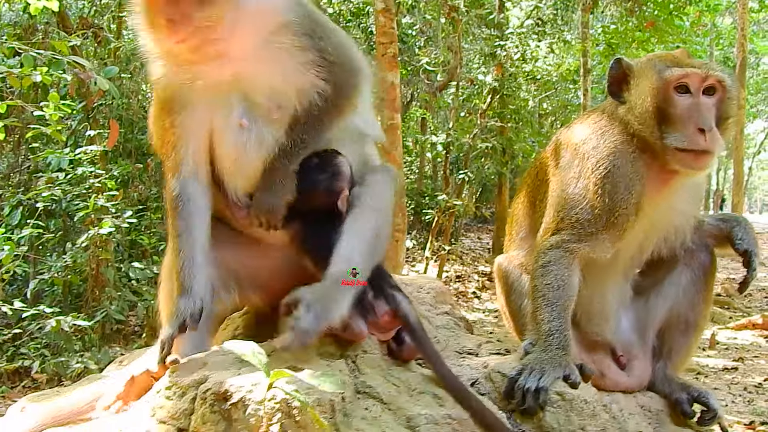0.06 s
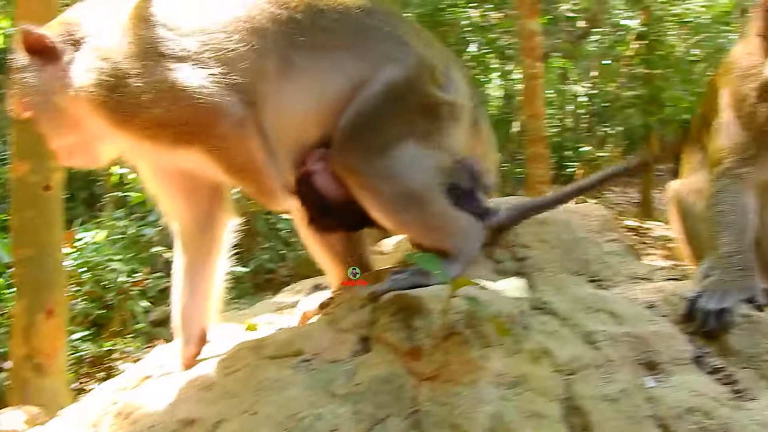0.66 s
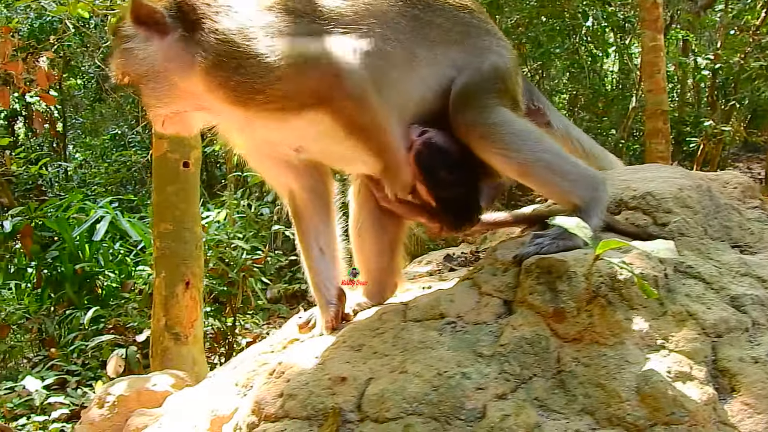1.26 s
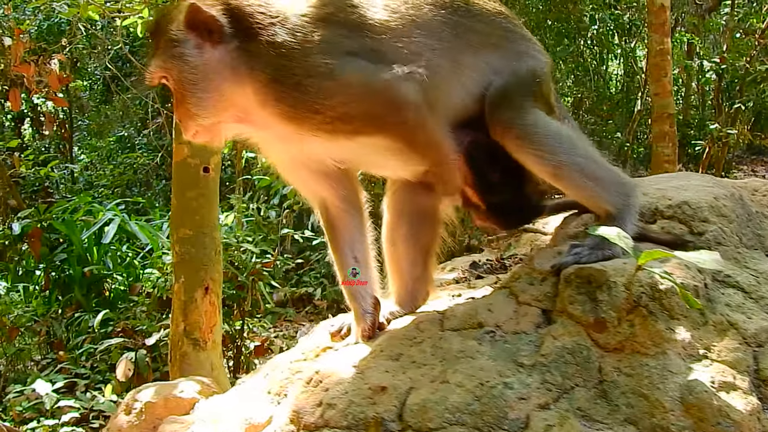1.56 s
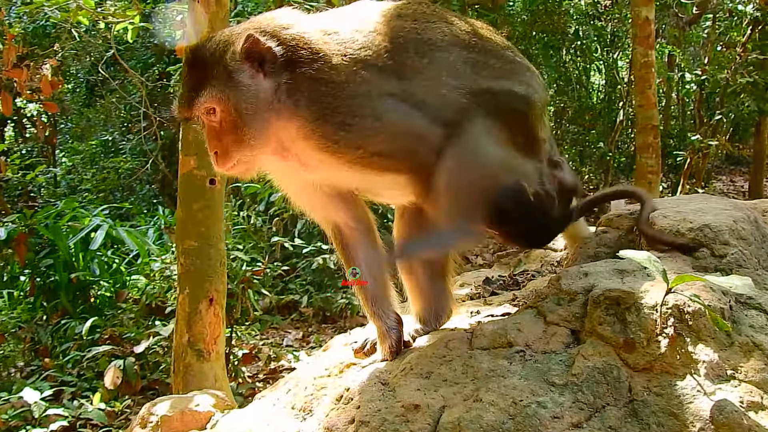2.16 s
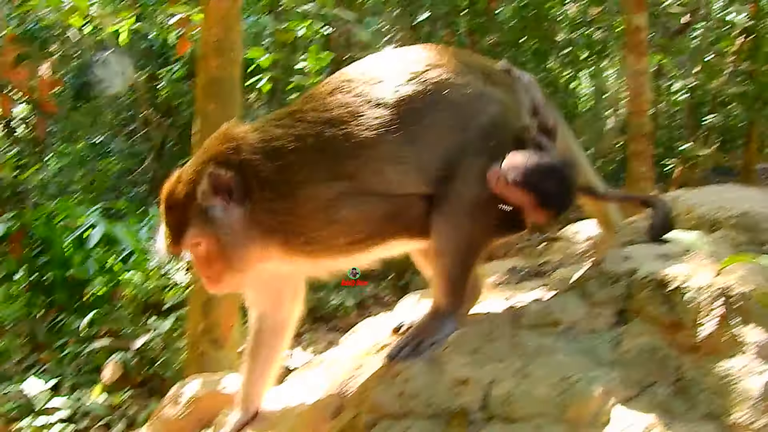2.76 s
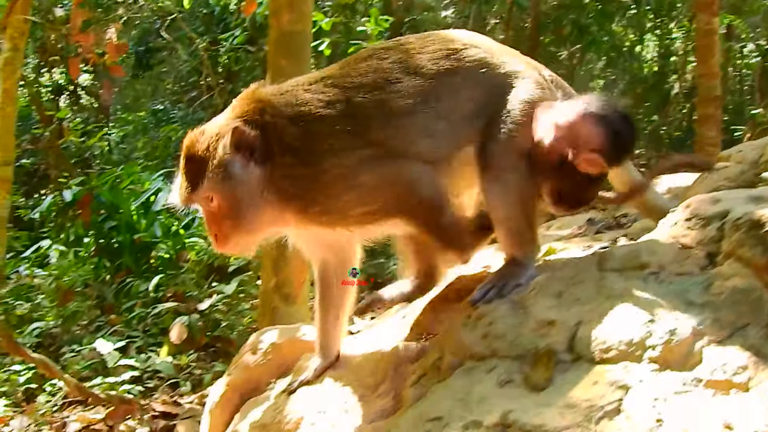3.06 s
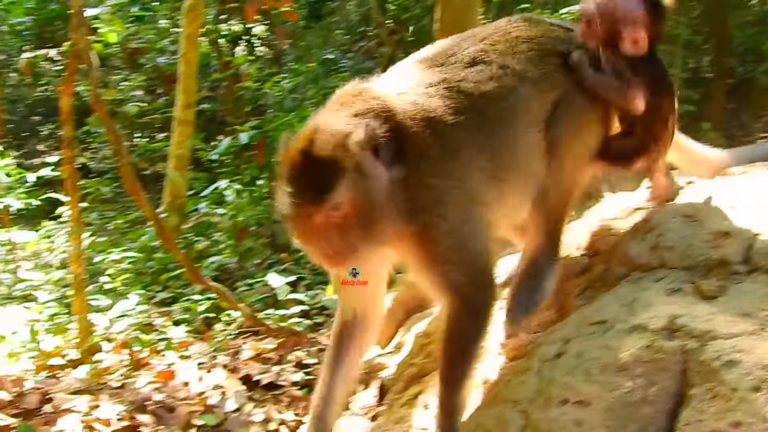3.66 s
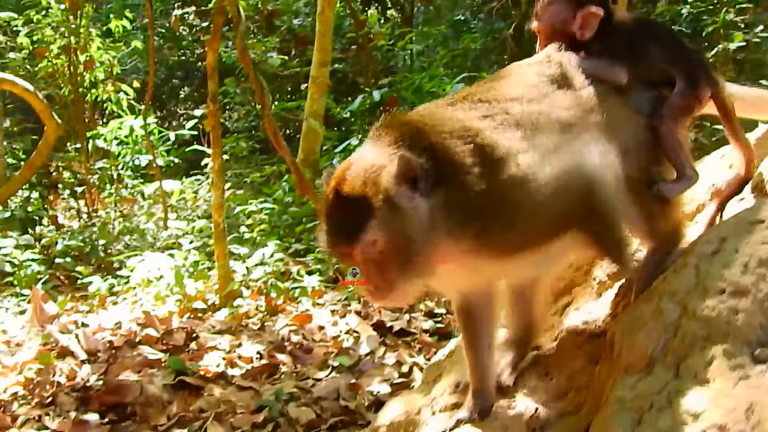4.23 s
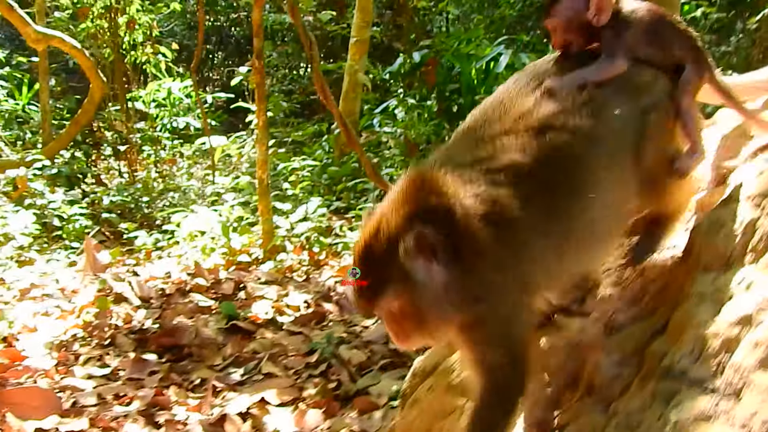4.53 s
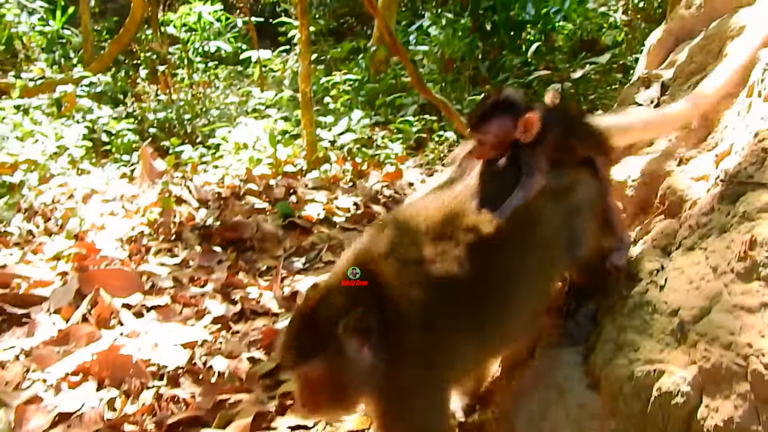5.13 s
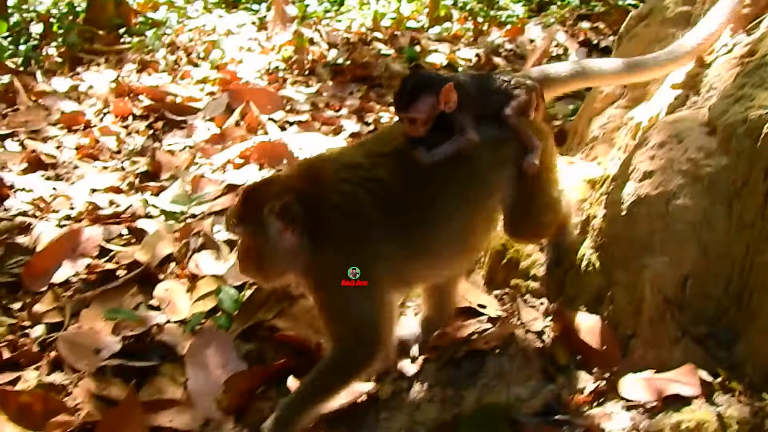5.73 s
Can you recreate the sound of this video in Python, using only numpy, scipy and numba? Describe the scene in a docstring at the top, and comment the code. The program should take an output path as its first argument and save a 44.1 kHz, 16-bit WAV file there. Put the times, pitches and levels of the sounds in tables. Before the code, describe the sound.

In a quiet forest, a few twigs snap and a monkey's feet scuff over rock and leaves. Close by, a baby monkey chirps, then lets out a quick run of shrill, falling squeals, a thin hoarse whine and a last squeak, each with a slight echo. Dry leaves rustle more toward the end, while faint birds whistle and a slow, distant engine thuds gradually louder.

```python
"""A forest: close by, a baby monkey squeaks and squeals as it climbs onto its walking mother.
Its tight vocal folds give whistles that fall in jumps, with a lower second voice and a rasp,
then a thin whine; the trees echo each call. Dry leaves rustle and twigs snap underfoot.
Far off, birds whistle faintly and a slow engine thuds through its exhaust, growing louder.
A limiter ducks it all under the loudest squeals."""
import sys
import numpy as np
from scipy import signal
from scipy.fft import rfft, irfft
from scipy.io import wavfile
from scipy.ndimage import uniform_filter1d
from numba import njit

SR = 44100
rng = np.random.default_rng(int(sys.argv[2]) if len(sys.argv) > 2 else 0)


def transcribe(signal):
    """Save signal, clipped to [-1, 1], as a 16-bit WAV file at the path in sys.argv[1]."""
    frames = np.atleast_2d(signal).T
    limited = np.clip(frames, -1, 1)
    pcm = np.round(limited * 32767).astype(np.int16)
    wavfile.write(sys.argv[1], SR, pcm)


N = 255471
TIME = np.arange(N) / SR


def undb(db):
    """Decibels to gain."""
    return 10 ** (np.asarray(db) / 20)


def unit(x):
    """Scale to rms 1."""
    return x / np.sqrt(np.mean(x ** 2))


def noise():
    """White noise."""
    return rng.standard_normal(N)


def decay(t60_s):
    """One second of decaying noise."""
    return rng.standard_normal(SR) * undb(-60 * TIME[:SR] / t60_s)


def walk(rate_hz):
    """Smooth random curve, rms 1, low-passed at rate_hz."""
    steps = rng.standard_normal(N // 8 + 2)
    smooth = unit(signal.sosfilt(signal.butter(3, rate_hz, fs=SR / 8, output="sos"), steps))
    return np.interp(np.arange(N) / 8, np.arange(len(smooth)), smooth)


def phase_of(hz):
    """Running phase of a frequency curve, in radians."""
    return 2 * np.pi * np.cumsum(hz) / SR


def curves(rows):
    """Per-sample curve for each column after time_s."""
    time_s, *columns = np.transpose(rows)
    return [np.interp(TIME, time_s, column) for column in columns]


def swell(start_s, length_s, rise_s, fall_s):
    """Trapezoid envelope."""
    return np.clip(np.minimum((TIME - start_s) / rise_s, (start_s + length_s - TIME) / fall_s), 0, 1)


def add(track, start_s, sound):
    """Mix a short sound into a track."""
    start = int(start_s * SR)
    track[start:start + len(sound)] += sound[:N - start]


def colour(x, response, size=8192):
    """Minimum-phase filter from rows of freq_hz, gain_db."""
    hz, db = np.transpose(response)
    gain = undb(np.interp(np.log(np.fft.rfftfreq(size, 1 / SR) + 1), np.log(hz), db))
    cepstrum = irfft(np.log(gain))
    cepstrum[1:size // 2] *= 2
    cepstrum[size // 2 + 1:] = 0
    impulse = irfft(np.exp(rfft(cepstrum)))[:size // 2]
    return signal.oaconvolve(x, impulse)[:N]


def stereo(mid, side, side_db):
    """Mid and side to left and right."""
    return mid + undb(side_db) * side * np.array([[1], [-1]])


def glides(rows, overtone_db, jitter=0.018):
    """Notes that swell, slide and fade, each with an octave overtone."""
    waver = 1 + jitter * (walk(680) + walk(30) / 2)
    out = np.zeros(N)
    for start_s, length_s, start_hz, end_hz, level_db in rows:
        progress = np.linspace(0, 1, int(length_s * SR))
        pitch_hz = start_hz + (end_hz - start_hz) * progress
        phase = phase_of(pitch_hz * waver[int(start_s * SR):][:len(progress)])
        tone = np.sin(phase) + undb(overtone_db) * np.sin(2 * phase)
        add(out, start_s, undb(level_db) * np.sqrt(8 * progress * (1 - progress)) * tone)
    return out


# bird whistles: start_s, length_s, start_hz, end_hz, level_db
BIRD_NOTES = [(.01, .38, 2610, 2530, -77), (.14, .22, 4290, 4170, -76.5), (4.782, .023, 1880, 2180, -60),
              (4.80, .033, 1430, 1270, -61), (4.80, .046, 6570, 5850, -59)]


def birds():
    """Faint, distant whistles that flutter in level."""
    return glides(BIRD_NOTES, overtone_db=-32) * undb(2 * walk(25))


# engine run: time_s, firing_hz, drone_db, thud_db
ENGINE_RUN = [(0.0, 30.42, -60.5, -60.5), (2.53, 31.34, -58.5, -63.5), (3.5, 31.56, -57, -59.5),
              (4.2, 31.76, -57.5, -55), (5.15, 31.87, -56, -50), (5.79, 31.26, -50, -47)]
# exhaust resonances in the drone: freq_hz, gain_db
EXHAUST_EQ = [(30, -46.5), (95, -16), (125, 5.5), (158, 6), (190, 2), (235, -4), (290, -2.5), (370, -4),
              (480, -12), (900, -28.5), (9000, -75)]
# boom of a direct thud: freq_hz, gain_db
THUD_EQ = [(36, -42.5), (60, 6.5), (125, 3), (190, -7.5), (270, 0), (900, -49)]


def engine(firing_at_s=5.4435, rebound_cycles=0.345, rebound_db=-4, smear_rad=0.06):
    """Each firing knocks twice through the exhaust; paths through the trees smear it into a drone."""
    firing_hz, drone_db, thud_db = curves(ENGINE_RUN)
    phase = phase_of(firing_hz)
    phase -= np.interp(firing_at_s, TIME, phase)
    harmonics = range(1, 17)
    # higher partials arrive later
    smeared = sum(undb(2.6 * walk(6.5)) * np.cos(k * phase - smear_rad * k * k) for k in harmonics)
    drone = unit(colour(smeared, EXHAUST_EQ)) + undb(-4.5) * unit(colour(noise(), EXHAUST_EQ))
    rebound_phase = phase - 2 * np.pi * rebound_cycles
    knocks = sum(np.cos(k * phase) + undb(rebound_db) * np.cos(k * rebound_phase) for k in harmonics)
    knocks *= undb(2 * walk(40))
    thuds = unit(colour(knocks, THUD_EQ)) + undb(-14) * unit(colour(noise(), THUD_EQ))
    return undb(drone_db) * unit(drone) + undb(thud_db) * unit(thuds)


# echo among the trees: freq_hz, gain_db
FOREST_EQ = [(1000, -8), (3500, 2.5), (6000, 1.5), (7500, 6.5), (10000, -2.5), (15000, -4)]


def forest_echo(x, far_t60_s=0.34, near_t60_s=0.12):
    """Rock and ground answer at once; trunks and leaves scatter a thin tail."""
    def tail():
        impulse = undb(-17) * unit(decay(far_t60_s)) + undb(-15) * unit(decay(near_t60_s))
        return signal.fftconvolve(x, colour(impulse / np.sqrt(SR), FOREST_EQ))[:N]
    return stereo(tail(), tail(), side_db=-5)


# path via the rock face: time_s, delay_s
ROCK_PATH = [(5.0, 0.003267), (5.6, 0.00443)]


def rock_reflection(x, reflection_db=-3.5):
    """Adds a dull reflection off the rock face, later as the walk leads away from it."""
    delay_s, = curves(ROCK_PATH)
    dull = uniform_filter1d(x, size=13)
    return unit(x + undb(reflection_db) * np.interp(TIME - delay_s, TIME, dull))


def leaf_cracks(rate_per_s=220, low_hz=641, high_hz=2613, t60_s=0.038):
    """Single dry leaves give way at random, each ringing at its own pitch; a few are louder."""
    out, t = np.zeros(N), TIME[:SR // 20]
    for when, pitch, rarity in rng.random((int(rate_per_s * N / SR), 3)):
        ring_hz = low_hz * (high_hz / low_hz) ** pitch
        size_db = -2 * np.log(max(rarity, 0.01))
        add(out, when * N / SR, undb(size_db - 60 * t / t60_s) * np.sin(2 * np.pi * ring_hz * t))
    return unit(out)


# steady stir of the litter: time_s, level_db
LITTER_STIR = [(0, -68), (2.4, -65.5), (3.3, -62), (4.25, -57), (5.27, -53), (5.79, -49)]
# scuffs of hands and feet: start_s, length_s, crackle_db, hiss_db
LIMB_SCUFFS = [(0.774, 0.18, -63, -66.5), (0.976, 0.22, -60, -62.5), (1.14, 0.71, -62, -61.5),
               (5.31, 0.33, -47.5, -53.5), (5.45, 0.23, -66, -49.5)]
# hollow body of the rustle: freq_hz, gain_db
CRACKLE_EQ = [(150, -1.5), (450, 3.5), (620, 4.5), (900, -1), (1250, 0), (1700, -3.5), (3300, -4),
              (5000, -6), (14000, -45.5)]
# foliage hiss: freq_hz, gain_db
HISS_EQ = [(1500, -6.5), (3000, -7), (4500, -3), (7000, 1.5), (8200, -8), (9500, -17.5), (12000, -28),
           (15000, -54)]


def leaves(rise_share=0.35):
    """Dry litter crackles under a hiss of foliage; both swell as weight comes onto a limb."""
    def crackle():
        return unit(colour(noise() * undb(2 * walk(1520) + 2 * walk(9.4)), CRACKLE_EQ))

    def hiss():
        return unit(colour(noise() * undb(1.5 * walk(240)), HISS_EQ))

    stir_db, = curves(LITTER_STIR)
    crackle_power, hiss_power = undb(stir_db) ** 2, undb(stir_db - 5.5) ** 2
    for start_s, length_s, crackle_db, hiss_db in LIMB_SCUFFS:
        weight = swell(start_s, length_s, rise_share * length_s, (1 - rise_share) * length_s)
        crackle_power += weight * undb(crackle_db) ** 2
        hiss_power += weight * undb(hiss_db) ** 2
    litter = rock_reflection(crackle() + undb(-10.5) * leaf_cracks())
    ground = np.sqrt(crackle_power) * stereo(litter, crackle(), side_db=-34)
    foliage = np.sqrt(hiss_power) * stereo(hiss(), hiss(), side_db=0)
    return ground + foliage


# foot drag: start_s, length_s, centre_hz, level_db
FOOT_DRAG = (1.19, 0.38, 1050, -63)


def scrape():
    """A sole sticks and slips over gritty rock in short, uneven pushes."""
    start_s, length_s, centre_hz, level_db = FOOT_DRAG
    octave = signal.butter(2, [centre_hz / 2 ** 0.5, centre_hz * 2 ** 0.5], "band", fs=SR, output="sos")
    grit = noise() * undb(3.5 * walk(90) + 2 * walk(20))
    envelope = swell(start_s, length_s, length_s / 10, length_s / 10)
    return undb(level_db) * envelope * unit(signal.sosfilt(octave, grit))


# twigs and pats: start_s, level_db, centre_hz, t60_s
TWIG_SNAPS = [(0.385, -50, 7150, 0.0087), (.604, -53, 1540, 0.03), (1.006, -43.5, 1960, 0.025),
              (1.404, -50, 1270, 0.029), (3.138, -51, 1700, 0.041), (5.379, -45, 1640, 0.05)]


def snaps(edge_ratio=1.97):
    """Twigs crack, hands and feet pat; each rings briefly in one broad band."""
    out = np.zeros(N)
    for start_s, level_db, centre_hz, t60_s in TWIG_SNAPS:
        low_hz, high_hz = centre_hz / edge_ratio, min(centre_hz * edge_ratio, SR / 4)
        band = signal.butter(5, [low_hz, high_hz], "band", fs=SR, output="sos")
        makeup = np.sqrt(SR / 2 / (high_hz - low_hz))
        add(out, start_s, undb(level_db) * makeup * signal.sosfilt(band, decay(t60_s)))
    return out


# chirp partials: start_s, length_s, start_hz, end_hz, level_db
CHIRP_PARTIALS = [(2.101, 0.016, 3210, 1880, -44), (2.300, 0.044, 5800, 5120, -48.5),
                  (2.308, 0.031, 4000, 3570, -48.5), (2.324, 0.011, 2860, 2040, -50),
                  (2.333, 0.0081, 5000, 3560, -42.5)]
# soft lead-ins to the first squeals: start_s
LEAD_IN_STARTS = [2.465, 2.638, 2.874]
# lead-in note: length_s, start_hz, end_hz, level_db
LEAD_IN_NOTE = (.012, 3600, 3750, -55)


def chirps(flutter_db=3, hoarse_db=-17):
    """Slacker folds give lower notes, alone or before a squeal; uneven airflow roughens them."""
    lead_ins = [(start_s, *LEAD_IN_NOTE) for start_s in LEAD_IN_STARTS]
    notes = glides(list(CHIRP_PARTIALS) + lead_ins, overtone_db=-21)
    return notes * unit(undb(flutter_db * walk(740))) * (1 + undb(hoarse_db) * walk(1900))


# loose vocal fold modes: freq_hz
FOLD_MODES_HZ = [4480, 5260, 6560, 7570, 8770, 9830, 11370]
# throat and mouth: freq_hz, gain_db
THROAT_EQ = [(2000, -27), (3400, -18), (4000, -9.5), (4700, 1.5), (5600, 5.5), (7000, 1.5), (9000, -9),
             (11000, -10.5), (13000, -11), (15500, -27)]


def rasp(air_db, flicker_db, jitter):
    """Irregular folds hop between shaky modes; air fills the gaps and the throat colours both."""
    modes = np.zeros(N)
    for mode_hz in FOLD_MODES_HZ:
        flicker = undb(flicker_db * walk(36))
        modes += flicker * np.sin(phase_of(mode_hz * (1 + 0.05 * walk(12) + jitter * walk(618))))
    voice = colour(unit(modes) + undb(air_db) * noise(), THROAT_EQ)
    return voice / np.sqrt(uniform_filter1d(voice ** 2, size=100))  # lungs hold the power steady


# long whine: time_s, pitch_hz, whistle_db, rasp_db
WHINE_CONTOUR = [(3.33, 10500, -50, -45.5), (3.35, 11300, -38.5, -46), (3.385, 12900, -54, -45),
                 (3.397, 12000, -58, -50.5), (3.47, 12800, -69, -56.5), (3.57, 12560, -53, -47.5),
                 (3.602, 13500, -58, -59.5), (3.655, 13600, -58, -53), (3.685, 12900, -71, -63),
                 (3.742, 13000, -57, -67), (3.775, 13300, -61, -56), (3.805, 12470, -56, -50),
                 (3.87, 12760, -64, -52), (3.945, 12600, -60, -53), (3.984, 13500, -69, -68),
                 (4.002, 12300, -56.5, -59), (4.075, 11700, -69, -52), (4.135, 11200, -59, -59)]
# narrowed mouth: freq_hz, gain_db
MOUTH_EQ = [(4400, 0), (7000, -1.5), (11500, 3.5), (14500, -8)]


def whine(quaver_hz=38, quaver_db=3.5, edge_s=0.00053):
    """Tightly squeezed folds give a thin, faltering whistle over a hoarse, broken rasp."""
    pitch_hz, whistle_db, rasp_db = curves(WHINE_CONTOUR)
    squeeze = walk(quaver_hz)  # tighter: higher and clearer
    phase = phase_of(pitch_hz * (1 + 0.009 * squeeze + 0.01 * walk(400)))
    whistle = unit(np.sin(phase) * undb(3.5 * walk(170)))
    hoarse = unit(colour(rasp(air_db=-7, flicker_db=7, jitter=0.06), MOUTH_EQ) * undb(2 * walk(45)))
    start_s, end_s = WHINE_CONTOUR[0][0], WHINE_CONTOUR[-1][0]
    gate = swell(start_s - edge_s / 2, end_s - start_s + edge_s, edge_s, edge_s)
    clear_db = quaver_db * squeeze
    return gate * (undb(whistle_db + clear_db) * whistle + undb(rasp_db - clear_db / 2) * hoarse)


# fold registers, added to the squeal levels: pitch_hz, whistle_db, rasp_db, low_db
FOLD_REGISTERS = [(4940, -0.5, -3, -44), (6160, 8, 4.5, -46), (7100, -7, 4, 13.5), (8390, -6, 2, 8),
                  (11360, -20.5, -12.5, -16.5), (12700, -37, -14, -35), (13500, -36, -36, -43)]
# squeals, one row per pitch jump; bend > 1 plunges late:
# start_s, length_s, start_hz, end_hz, bend, whistle_db, rasp_db, low_start_hz, low_db
SQUEAL_FALLS = [(2.474, .051, 8600, 6950, 1.9, -30, -47, 5900, -59),
                (2.537, 0.025, 6340, 5500, 0.92, -36.5, -50, 4800, -46),
                (2.646, 0.026, 11530, 10700, 0.96, -18, -21.5, 7100, -20),
                (2.668, 0.056, 10170, 8900, 1.1, -20.5, -32, 6100, -27.5),
                (2.718, 0.042, 8000, 4600, .8, -26, -37, 6320, -38),
                (2.883, 0.017, 10600, 10450, 1, -13, -30, 5700, -36),
                (2.895, 0.05, 10700, 8150, 0.6, -24, -29, 6000, -33),
                (2.954, 0.018, 10000, 9600, 1, -29, -28, 5000, -34),
                (2.967, 0.04, 9350, 5500, 0.6, -26, -30, 7570, -43),
                (3.161, 0.052, 9450, 9250, 0.45, -29, -36, 5045, -41),
                (3.222, 0.032, 11540, 10200, 2.4, -28, -31, 5640, -33),
                (3.247, .078, 9800, 7450, 0.85, -32, -37, 5700, -48),
                (3.695, 0.033, 10350, 8100, 0.43, -46, -50, 7000, -62),
                (4.131, .022, 10720, 3800, 1.7, -43, -44, 6500, -57),
                (4.467, .053, 13800, 12200, 1.2, -28, -50, 8300, -65),
                (4.513, .05, 12300, 4200, 1.35, -35, -50, 7400, -51)]


def squeal_contours(attack_s=0.0037, release_s=0.008, fade_share=0.29, low_follow=0.8):
    """Pitches and gains per squeal: the folds slacken, and the falling pitch sets the register."""
    register_hz, *register_db = np.transpose(FOLD_REGISTERS)
    for row in SQUEAL_FALLS:
        start_s, length_s, start_hz, end_hz, bend, whistle_db, rasp_db, low_start_hz, low_db = row
        progress = np.clip((TIME - start_s) / length_s, 0, 1)
        pitch_hz = start_hz + (end_hz - start_hz) * progress ** bend
        low_hz = low_start_hz * (pitch_hz / start_hz) ** low_follow
        whistle, rough, low = (undb(np.interp(pitch_hz, register_hz, db)) for db in register_db)
        held = swell(start_s, length_s, attack_s, release_s)
        fading = swell(start_s, length_s, attack_s, fade_share * length_s)
        yield (pitch_hz, low_hz, held * whistle * undb(whistle_db),
               fading * rough * undb(rasp_db), fading * low * undb(low_db))


def squeals(jitter=0.0055, strain_jitter=0.022, tremble=0.011):
    """Tight folds whistle over a lower voice and beat with it; driven harder, both shake and rasp."""
    shake = walk(860)
    waver, low_waver = 1 + tremble * walk(59), 1 + tremble * walk(76)
    trade = undb(walk(85))  # the voices take strength from each other
    chaos = rasp(air_db=-9, flicker_db=11, jitter=0.028)
    cling = 0.33 * walk(800)  # part of the rasp clings to the whistle
    slaps = unit(undb(3.5 * walk(550)))  # the folds slap unevenly
    voices, beats = np.zeros((2, N))
    for pitch_hz, low_hz, whistle_gain, rasp_gain, low_gain in squeal_contours():
        on = whistle_gain > 0
        strain = np.minimum(rasp_gain[on] / whistle_gain[on], 1) ** 2
        wobble = (jitter + strain * strain_jitter) * shake[on]
        high_phase = phase_of(pitch_hz[on] * (waver[on] + wobble))
        low_phase = phase_of(low_hz[on] * (low_waver[on] + wobble))
        tones = np.zeros((3, N))
        tones[:, on] = np.sqrt(2) * np.sin([high_phase, low_phase, high_phase - low_phase])
        whistle, low_voice, beat = tones
        rough = (chaos + cling * whistle) * slaps
        voices += whistle_gain * whistle * trade + low_gain * low_voice / trade + rasp_gain * rough
        beats += low_gain * beat
    return voices + undb(-9) * colour(beats, THROAT_EQ)


def scene():
    """Monkey and twigs near and ahead; rustle, birds and engine around them."""
    near = squeals() + whine() + chirps() + snaps() + scrape()
    # the two microphone ports hear the highest notes slightly out of step
    direct = stereo(near, np.gradient(near), side_db=-5.5)
    return direct + birds() + forest_echo(near) + leaves() + engine()


@njit
def follow(x, attack, release):
    """Envelope follower; coefficients per sample."""
    out, level = np.empty(len(x)), 0.0
    for i in range(len(x)):
        level += (x[i] - level) * (attack if x[i] > level else release)
        out[i] = level
    return out


def record(dry, threshold_db=-29.5, attack_s=0.00038, release_s=0.016, cutoff_hz=15700, fade_s=0.003):
    """Fast limiter on the squeals, fade-out, steep low-pass."""
    envelope = follow(np.abs(dry).mean(axis=0), 1 / (attack_s * SR), 1 / (release_s * SR))
    limited = dry / np.maximum(1, envelope / undb(threshold_db))
    fade = np.minimum(1, (TIME[-1] - TIME) / fade_s)
    return signal.sosfilt(signal.ellip(8, 0.2, 70, cutoff_hz, fs=SR, output="sos"), limited * fade)


dry = scene()
out = record(dry)
transcribe(out)
```